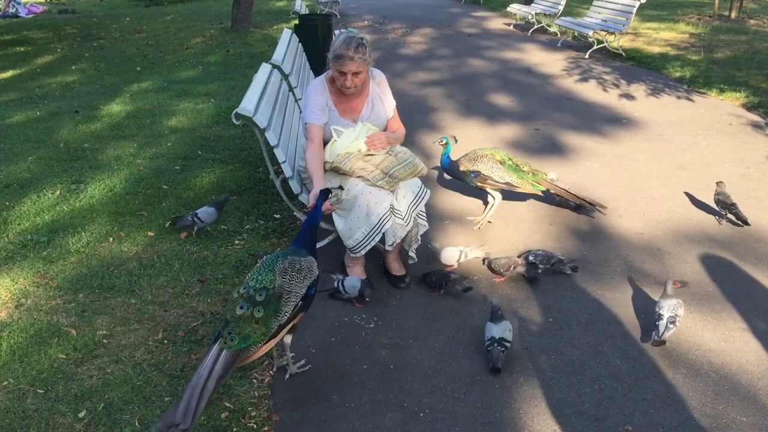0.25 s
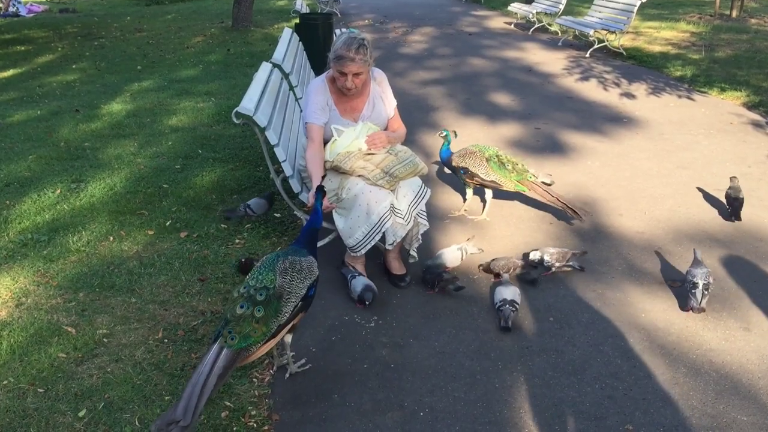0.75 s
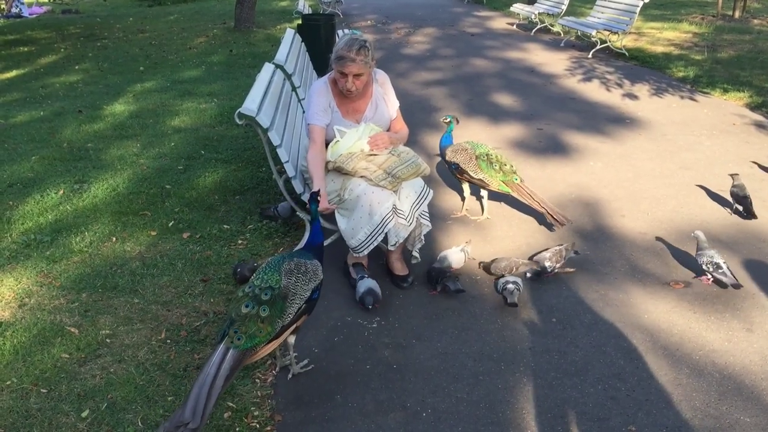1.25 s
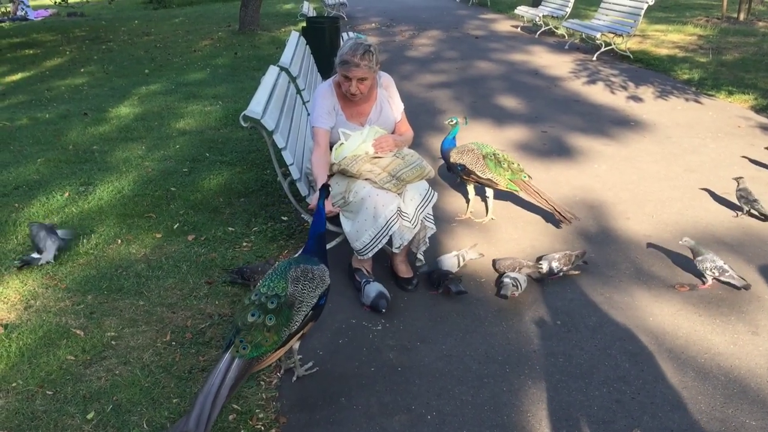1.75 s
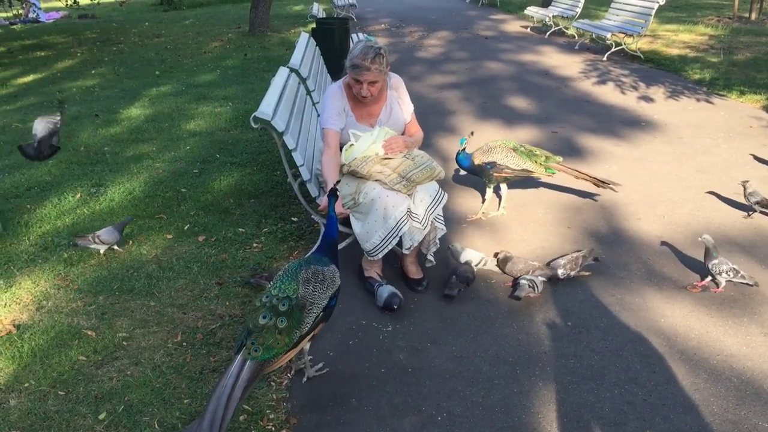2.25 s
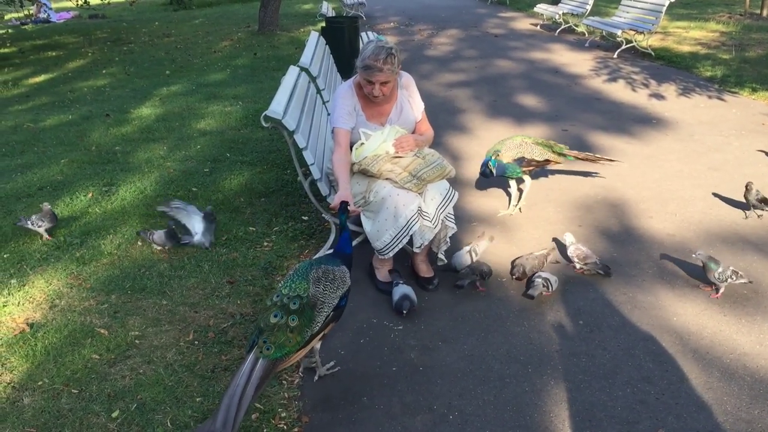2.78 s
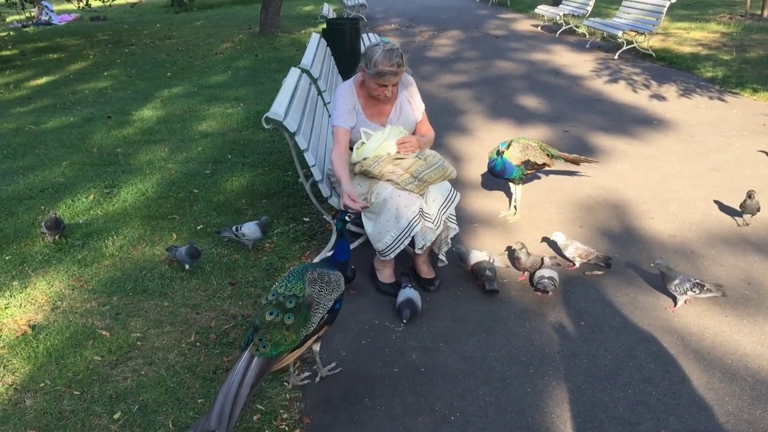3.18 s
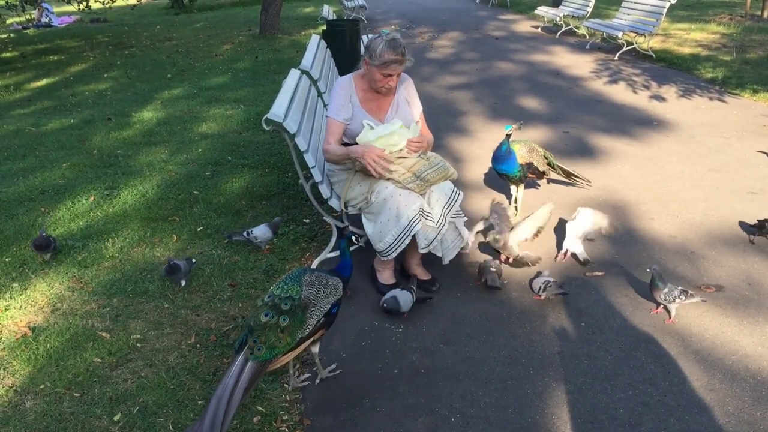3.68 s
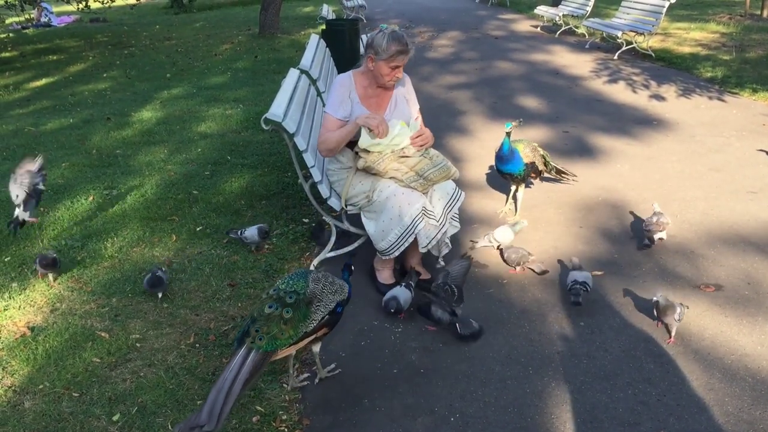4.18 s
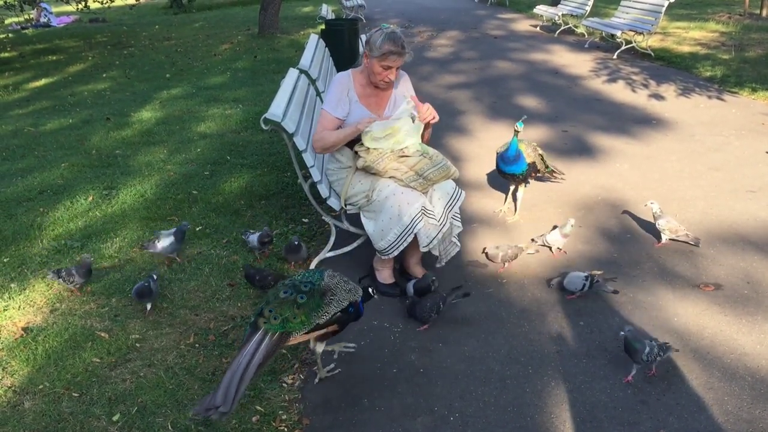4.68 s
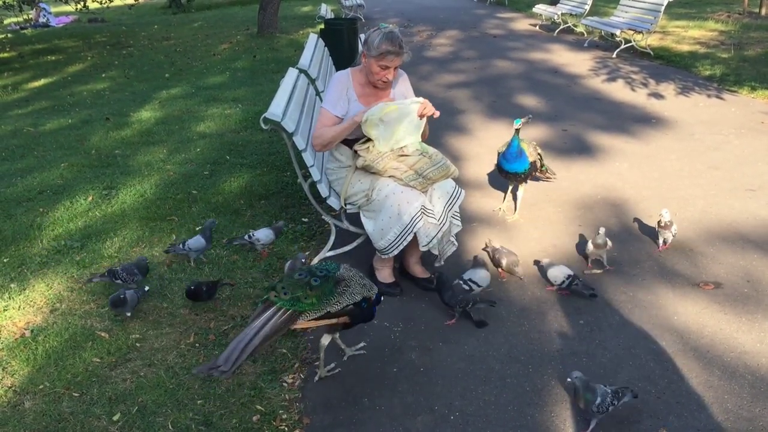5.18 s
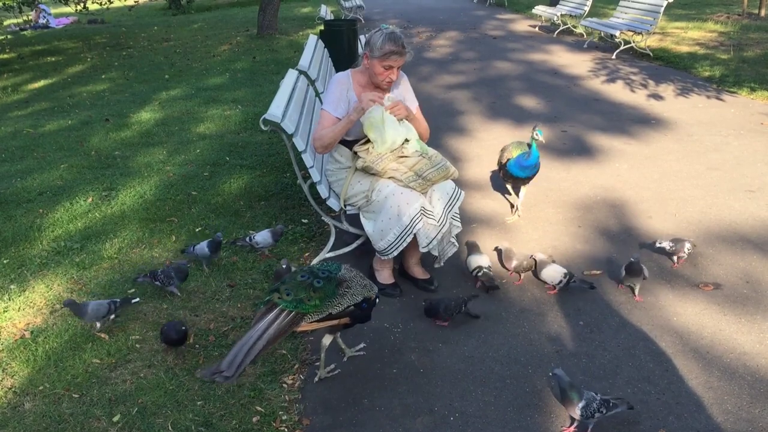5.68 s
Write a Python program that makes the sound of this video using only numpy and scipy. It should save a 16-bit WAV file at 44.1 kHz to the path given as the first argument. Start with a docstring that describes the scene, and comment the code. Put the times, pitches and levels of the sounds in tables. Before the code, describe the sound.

Faint insects trill and small birds chirp outdoors until a peacock calls once, loudly, with a brief echo.

```python
"""A peacock calls in a park

A peacock gives one loud cry that arches in pitch; its throat rings with the second harmonic (twice
the pitch). Trees throw the cry back, and a low rush with soft thumps and dry clicks starts and stops
abruptly around it. Behind it a cricket trills with its wings, small birds chip and whistle far off,
pigeons flap in puffs of air, and insects hiss."""
import sys
import numpy as np
from scipy import signal
from scipy.fft import rfft, irfft, next_fast_len
from scipy.io import wavfile
from scipy.ndimage import uniform_filter1d, map_coordinates

SR = 44100
rng = np.random.default_rng(int(sys.argv[2]) if len(sys.argv) > 2 else 0)


def unload_audio(sound):
    """Save the sound as a 16-bit wav file, at the path given as the first command line argument."""
    columns = np.transpose(np.atleast_2d(sound))
    # keep every value between -1 and 1, then stretch to whole-number steps
    steps = np.round(np.clip(columns, -1, 1) * 32767)
    wavfile.write(sys.argv[1], SR, steps.astype(np.int16))


N = 261513


def peacock(catch_s=4.61, open_s=4.672, tire_s=5.064, close_s=5.252, release_s=.02):
    """A cry whose second harmonic sits on the throat's resonance and carries nearly all the power."""
    # Each row: time in seconds, pitch in Hz.
    arch = [(4.63, 601), (4.644, 601), (4.696, 625.4), (4.72, 646), (4.786, 663.3), (4.912, 685.5),
            (4.926, 683), (5.02, 689.5), (5.082, 684.8), (5.092, 679.6), (5.232, 665.6), (5.245, 659.4)]
    # Harmonics five to nine. Each row: multiple of the pitch, relative level in dB.
    overtones = [(5, -38), (6, -28.5), (7, -39), (8, -41.5), (9, -42.5)]
    # Narrow resonances of throat and beak. Each row: frequency in Hz, gain in dB.
    throat = [(6300, -46), (6600, -38.5), (6860, -32), (7250, -39), (7550, -39.5), (7800, -35.5),
              (8100, -47), (8250, -42.5), (8480, -36.5), (8900, -40), (9200, -49.5), (9580, -39),
              (10020, -40), (10330, -44), (10700, -40), (11000, -44.5), (11320, -39), (11650, -49),
              (12000, -49.5), (12700, -47), (13800, -55.5), (15000, -56)]
    # What the treble loses when the voice is pinched. Each row: frequency in Hz, loss in dB.
    pinch_loss = [(6700, 1), (7600, 7.5), (9500, 7.5), (11500, 8.5), (13500, 1), (15000, -0.5)]
    # the voice catches, then goes through these stages, each rising from 0 to 1
    opened, settled, pinched = ramp(open_s, .037), ramp(4.745, .071), ramp(4.99, .1)
    tired, shut = ramp(tire_s, close_s - tire_s), ramp(close_s, release_s)
    gasp = tired ** 2
    hoarse = 1 - settled + gasp
    pitch = curves(arch)[0] * (1 - .066 * ramp(close_s, release_s / 2))  # drops as the beak closes
    catch_db = -16.5 * (1 - opened)
    main_db = -20 + catch_db - 7 * gasp - 10.5 * shut
    fourth_db = main_db - 25 + .07 * (pitch - pitch.max()) - 11 * tired
    low_db = -43.5 + catch_db / 4 - 11.5 * settled - 4 * pinched
    treble_db = main_db + 1 - 5 * (1 - settled) - 5.5 * tired
    # a slowing flutter, deepest as the voice starts and gives out; the pitch dips at each throb
    age = np.maximum(clock() - catch_s, 0)
    flutter_hz = (57.5 - 15.6 * age) * (age > 0)
    flutter = -np.cos(phase_of(flutter_hz))
    catching = ramp(catch_s, open_s - catch_s) * (1 - opened) ** 2
    throb = 1 + (.085 + .13 * (1 - settled) + .64 * catching + .37 * gasp) * flutter
    jitter = (.0016 + .0038 * hoarse) * wobble(200)
    phase = phase_of(pitch * (1 - .0035 * flutter + jitter))
    voiced = gate(catch_s, close_s + release_s, .0039) * amp(.6 * wobble(30))

    def harmonic(k, db):
        """A tone at k times the pitch that wavers on its own; high ones fray when hoarse."""
        waver_db = 1.1 * rng.uniform(-1, 1) * flutter + 1.4 * wobble(14) + .7 * wobble(110)
        fray = (.07 + .45 * hoarse) * (k / 16) ** 2 * wobble(600)
        return amp(db + waver_db) * np.sin(k * phase + fray)

    treble = middle = 0
    for k in range(10, 24):
        treble += harmonic(k, along(throat, k * pitch) - pinched * along(pinch_loss, k * pitch))
    # the sixth harmonic flares in the windpipe's upper resonance, and again when pinched
    for k, db in overtones:
        windpipe_db = 9 / (1 + ((k * pitch - 3830) / 90) ** 2)
        middle += harmonic(k, db + windpipe_db + 5 * pinched * (k == 6))
    low = harmonic(1, low_db) + harmonic(3, low_db - 9)
    breath = noise([(1000, -20), (3000, -8), (9000, 0), (15000, -13)], -10)[0]
    hiss = amp(-54 + 10.5 * hoarse) * breath * (1 + np.cos(phase))  # air hisses in each cycle
    rasp = noise([(500, -33.5), (1100, -3), (1350, -2.5), (1700, -18), (3000, -17), (9000, -43)], -11.5)
    top = ground_bounce(opened * amp(treble_db) * (treble + hiss))
    body = low + harmonic(4, fourth_db) + amp(main_db - 2) * middle
    main = amp(main_db) * (np.sin(2 * phase) + amp(-47) * rasp[0])
    beak_fade = 1 - ramp(close_s - release_s, release_s * 1.7)
    rest = beak_fade * (panned(throb * body, -.6) + top)
    return np.sqrt(2) * voiced * (panned(throb * main, -4) + rest)


def ground_bounce(treble):
    """A bounce off the path colours the cry's treble differently on each side."""
    # Left, then right. Each row: delay in seconds, share added (minus flips the wave).
    bounces = [(.0011, -0.32), (.0017, -0.37)]
    # Where the treble sits. Each row: frequency in Hz, left over right in dB.
    treble_pan = [(6500, 0.5), (8500, 0.5), (10500, 2), (12000, -2)]
    sides = np.array([treble + share * delayed(treble, delay) for delay, share in bounces])
    return filtered(sides, lambda hz: amp(np.outer([.5, -.5], along(treble_pan, hz))))


def trees(cry, tail_db=-30.5, travel_s=.09):
    """A few distinct echoes and a long blurred tail come back from the trees."""
    # Low harmonics spread all round and reach the trees best. Each row: frequency in Hz, gain in dB.
    spread = [(400, 5), (620, 10), (655, 16), (680, 20), (740, 18), (1000, 2), (1350, -1), (1850, 8),
              (2030, 20), (2700, 1), (4000, 3), (8000, -6)]
    # Each row: delay in seconds, gain in dB, left over right in dB.
    echo_paths = [(.135, -40, -3), (.25, -31, -2), (.385, -37, 1), (.56, -39, -2)]
    # Each row: frequency in Hz, seconds the tail takes to fade by 60 dB.
    fade_times = [(300, 0.81), (650, 2.2), (1400, 2.8), (4000, 0.47), (10000, 0.15)]
    sent = filtered(cry.mean(axis=0), lambda hz: amp(along(spread, hz)))
    echoes = sum(panned(amp(db) * late(sent, delay), pan) for delay, db, pan in echo_paths)
    return echoes + amp(tail_db) * scatter(late(sent, travel_s), fade_times, -9.5)


def rush(rumble_floor_db=-72, rush_floor_db=-60, fade_db_per_s=111.5):
    """A lumpy rumble and a dull rush swell as the cry begins and again after it."""
    # Each row: start in seconds, end in seconds, rumble level in dB, rush level in dB.
    swells = [(4.475, 4.694, -52.5, -50), (5.458, 5.65, -68, -50)]
    # The tone of the two noises. Each row: frequency in Hz, relative level in dB.
    rumble_colour = [(15, -27), (40, -1), (75, -3.5), (105, 0.5), (140, -3.5), (230, -6), (400, -8),
                     (900, -53.5), (3000, -89)]
    rush_colour = [(100, -17.5), (250, -8.5), (420, -1.5), (650, -2.5), (900, -6.5), (1250, 0.5),
                   (1700, -10), (2400, -20), (5000, -23.5), (10000, -38.5), (15000, -73.5)]
    rumble_gain, rush_gain = amp(rumble_floor_db), amp(rush_floor_db)
    for start, end, rumble_db, rush_db in swells:
        outside_s = abs(clock() - np.clip(clock(), start, end))
        swell = amp(-fade_db_per_s * outside_s)
        rumble_gain = np.hypot(rumble_gain, amp(rumble_db) * swell ** 2)  # fades twice as fast
        rush_gain = np.hypot(rush_gain, amp(rush_db) * swell)
    lumps = amp(2 * wobble(30))
    return rumble_gain * lumps * noise(rumble_colour, -34) + rush_gain * noise(rush_colour, -19)


def thumps(sag=.12):
    """Each soft thump is a few cycles of a low, sinking note."""
    # Each row: time of the peak in seconds, pitch in Hz, half-length in seconds, level in dB.
    bumps = [(4.546, 215, 0.0057, -41.5), (4.581, 210, .009, -45), (4.634, 102, .013, -41.5),
             (5.083, 100, 0.013, -56), (5.185, 90, 0.0096, -62), (5.266, 94.6, 0.0077, -51.5),
             (5.391, 100.2, 0.011, -53.5), (5.451, 105, 0.0072, -51.5)]
    out = np.zeros(N)
    for (peak_s, hz, half_s, db), turn in zip(bumps, rng.random(len(bumps))):
        offset = np.clip((clock() - peak_s) / half_s, -4, 4)
        tone = np.sin(phase_of(hz * (1 - sag * offset)) + 2 * np.pi * turn)
        out += amp(db) * np.exp(-offset ** 2) * tone
    return out


def clicks(fade_s=.0093, dull_hz=3300):
    """Dull cracks of noise die at once, as the rush starts and as the voice catches and opens."""
    # Each row: start in seconds, level in dB.
    cracks = [(4.457, -39), (4.607, -44), (4.6684, -32)]
    level = sum((clock() > s) * amp(db - 60 * np.maximum(clock() - s, 0) / fade_s) for s, db in cracks)
    crack = level * noise([(100, -10), (600, 5), (2000, 8), (3500, -10), (7000, -34)], -7)
    return filtered(crack, lambda hz: 1 / (1 + (hz / dull_hz) ** 6))


def cricket(tone_hz=6235, flat_hz=190, strokes_per_s=54.65, bout_s=.682):
    """Wing strokes pulse one tone; each bout starts a little low and soft, then settles."""
    # The start of each bout in seconds.
    bout_starts = [-.31, 1.134, 2.525, 4.06, 5.53]
    out = np.zeros(N)
    for start in bout_starts:
        unsettled = 1 - ramp(start, .19)
        strokes = 2 * np.clip(.55 - np.cos(2 * np.pi * strokes_per_s * (clock() - start)), 0, 1)
        tone = np.sin(phase_of(tone_hz * (1 + .006 * wobble(400)) - flat_hz * unsettled))
        out += gate(start, start + bout_s, .0034) * amp(-57.5 - 2 * unsettled) * strokes * tone
    return panned(out, 1) + amp(-18) * scatter(out, [(6000, .28)], 0)


def chipping_bird(rasp_width_hz=190):
    """A small bird's chips hook up sharply and fall away hoarsely; now and then it rasps."""
    # Each row: start in seconds, level in dB, hoarseness (1 is usual), change in the tail in dB.
    chips = [(.465, -56, .9, 0), (.872, -54, .9, .5), (1.367, -52, .9, -1.5), (1.954, -51, .9, -2),
             (2.394, -53, 1.8, .5), (2.602, -51.5, 1, 0), (3.295, -50.5, 1, -2), (3.957, -53, 1, -2)]
    # One chip. Each row: seconds from its start, pitch in Hz, gain in dB, jitter as a share of pitch.
    shape = [(0, 3850, -7, .02), (.008, 4220, 1, .012), (.015, 4330, 1.5, .012), (.024, 4050, -4, .03),
             (.034, 3600, -8.5, .06), (.07, 3050, -10.5, .06)]
    # Each row: start in seconds, length in seconds, frequency in Hz, level in dB.
    rasps = [(1.124, 0.23, 4300, -64), (3.617, 0.094, 4060, -60.5), (4.568, 0.11, 4185, -53.5),
             (5.421, 0.18, 4170, -57.5)]
    tail_s, chip_s = shape[-2][0], shape[-1][0]
    out = np.zeros(N)
    for (start, db, hoarse, tail_db), tuning in zip(chips, rng.normal(1, .008, len(chips))):
        hz, shape_db, jitter = curves(shape, start)
        tone = np.sin(phase_of(hz * (tuning + hoarse * jitter * wobble(700))))
        level_db = db + shape_db + tail_db * ramp(start, tail_s) ** 2 + 1.2 * wobble(120)
        out += gate(start, start + chip_s, .002) * amp(level_db) * tone
    for start, length, hz, db in rasps:
        band = filtered(rng.standard_normal(N), lambda f: np.exp(-((f - hz) / rasp_width_hz) ** 2))
        out += gate(start, start + length, .016) * amp(db) * unit(band)
    return amp(-2) * out + amp(-1.5) * scatter(out, [(4000, .71)], 0)


def birds_and_tones(waver=.012, quaver_hz=24, quaver_db=3, chatter_low_hz=732, chatter_high_hz=2390):
    """Far birds call, blurred by distance; two thin tones and a rough burst sound around the cry."""
    # Bird whistles, plus two brief tones near 4 kHz: one as the rush starts, one ringing after the cry.
    # Each row: start and length in seconds, first and last pitch in Hz, level in dB.
    thin_tones = [(0.164, 0.2, 7730, 7350, -61.5), (2.203, 0.26, 2132, 2076, -70),
                  (2.262, 0.12, 10070, 10850, -70), (2.945, 0.38, 1968, 1964, -75.5),
                  (3.378, 0.18, 2357, 2470, -67), (4.449, 0.069, 3980, 4015, -47.5),
                  (5.319, .13, 3977, 3998, -54), (5.377, 0.15, 2516, 2516, -61)]
    # A songbird's two phrases, a list each. Each row: time in seconds, pitch in Hz, level in dB.
    phrases = [
        [(.17, 2420, -77), (.4, 2285, -68.5), (.52, 2398, -65), (.62, 2510, -65), (.66, 2493, -56),
         (.79, 2390, -58.5), (.88, 2444, -62), (.98, 2400, -73)],
        [(1.58, 2600, -71), (1.65, 2544, -67), (1.685, 2510, -56), (1.75, 2420, -61), (1.8, 2290, -58),
         (1.87, 2222, -62), (1.96, 2146, -61), (2.03, 2130, -72)],
    ]
    # Bird pips; the last row is instead a short, rough burst near 1.3 kHz as the rush starts.
    # Each row: the same as a thin tone, then jitter as a share of pitch.
    short_notes = [(0, .028, 1330, 1350, -58, .03), (.018, .045, 980, 880, -58.5, .04),
                   (.035, .05, 1850, 1350, -58, .02), (.052, .04, 3480, 3480, -58, .006),
                   (.322, .028, 1240, 1300, -61, .03), (1.352, .024, 1380, 1440, -54, .02),
                   (1.862, .03, 3480, 3470, -57.5, .006), (2.055, .035, 3490, 3470, -57, .006),
                   (2.474, .05, 950, 810, -58, .06), (2.78, .04, 770, 800, -64, .06),
                   (2.935, .075, 870, 840, -63, .08), (2.995, .035, 1950, 1965, -61.5, .008),
                   (3.04, .032, 820, 850, -59.5, .04), (3.105, .035, 900, 830, -64, .06),
                   (3.14, .14, 780, 760, -67, .03), (3.26, .045, 1270, 1400, -64, .02),
                   (3.29, .04, 860, 850, -64.5, .05), (4.231, .04, 1220, 1250, -61.5, .05),
                   (4.457, .045, 1400, 1280, -48, .1)]

    def note(start, length, first_hz, last_hz, db, jitter=waver):
        """One gliding tone that swells and fades."""
        progress = ramp(start, length)
        hz = (first_hz + (last_hz - first_hz) * progress) * (1 + jitter * wobble(350))
        return np.sin(np.pi * progress) * amp(db) * np.sin(phase_of(hz))

    out = sum(note(*row) for row in thin_tones)
    for phrase in phrases:
        hz, db = curves(phrase)
        quaver = quaver_db * np.cos(2 * np.pi * quaver_hz * (clock() - phrase[2][0]))
        tone = np.sin(phase_of(hz * (1 + waver * wobble(350))))
        song = gate(phrase[0][0], phrase[-1][0], .02) * amp(db + quaver) * tone
        out += song + amp(-12) * late(song, .13)  # one echo from the trees
    out *= amp(2.2 * wobble(60))  # the level flickers
    for when, height in rng.random((14, 2)):
        hz = chatter_low_hz * (chatter_high_hz / chatter_low_hz) ** height
        out += note(when * N / SR, .12, hz, hz, db=-72.5)
    out += sum(note(*row) for row in short_notes)
    tail = scatter(out, [(800, .3), (1300, .18), (2400, .94), (3500, .77), (10000, .13)], 0)
    return panned(out, 2) + amp(-4) * tail


def pigeons(puff_hz=1174, width=.095):
    """Each wing beat is a short puff of air."""
    # Each row: start in seconds, length in seconds, beats a second, level in dB.
    flurries = [(0, 0.084, 27, -66), (0.628, 0.45, 23.2, -62.5), (1.574, 0.32, 22.2, -61.5)]
    out = np.zeros(N)
    band = lambda hz: np.exp(-(np.log((hz + 1) / puff_hz) / width) ** 2)
    for start, length, rate, db in flurries:
        beats = np.sin(np.pi * rate * (clock() - start)) ** 6
        puff = unit(filtered(rng.standard_normal(N), band))
        out += gate(start, start + length, .0064) * amp(db) * beats * puff
    return panned(out, 1) + amp(-8) * scatter(out, [(1000, .3)], 0)


def open_air():
    """A soft, wide wash of air drifts in level."""
    # Each row: frequency in Hz, relative level in dB.
    colour = [(15, -50), (45, -14), (130, -26), (250, -27.5), (400, -15), (560, -11.5), (800, -2),
              (1000, -5), (1300, -3), (2000, -4), (3500, -6), (5000, -41.5), (9000, -67.5)]
    return amp(-64.5 + 1.06 * wobble(3.584)) * patchy(noise(colour, 2.6), 2.7)


def insects():
    """An insect chorus hisses at 4-7 kHz, with a faint, even high hiss above it."""
    # Each row: frequency in Hz, relative level in dB.
    colour = [(2500, -29), (3700, -10.5), (4200, -3), (4450, -8), (4660, 2), (5050, -11.5), (5370, 3.5),
              (5900, -0.5), (6550, -7), (6900, 6.5), (7150, 1), (7550, -14.5), (9200, -22.5),
              (10000, -31.5), (12800, -31), (14000, -59.5)]
    return amp(-57 + .36 * wobble(1.66) + .52 * wobble(40)) * patchy(noise(colour, 0), 2.5)


def amp(db):
    """Turns decibels into a gain."""
    return 10 ** (np.asarray(db) / 20)


def unit(x):
    """Scales x to an average power of 1."""
    return x / np.sqrt(np.mean(x ** 2) + 1e-20)


def clock():
    """The time of every sample in seconds."""
    return np.arange(N) / SR


def along(points, hz):
    """Reads between (Hz, value) points, with octaves evenly spaced."""
    freqs, values = np.transpose(points)
    return np.interp(np.log(hz + 1), np.log(freqs + 1), values)


def curves(rows, start=0):
    """One value per sample for each column after the time."""
    times, *columns = np.transpose(rows)
    return [np.interp(clock() - start, times, column) for column in columns]


def ramp(start, length):
    """Rises from 0 to 1 over a length of time."""
    return np.clip((clock() - start) / length, 0, 1)


def gate(start, end, edge):
    """One between two times, with sloping edges."""
    return ramp(start, edge) * np.clip((end - clock()) / edge, 0, 1)


def wobble(rate):
    """A smooth curve through rate random points a second."""
    points = rng.standard_normal(int(N * rate / SR) + 4)
    return map_coordinates(points, [clock() * rate])


def phase_of(hz):
    """The running phase of a frequency curve."""
    return 2 * np.pi * np.cumsum(hz) / SR


def panned(x, pan_db):
    """Leans a sound left (plus) or right (minus)."""
    return x * amp([[pan_db / 2], [-pan_db / 2]])


def filtered(x, response):
    """Scales each frequency of x by response(hz)."""
    size = next_fast_len(N + SR // 2)
    return irfft(rfft(x, size) * response(np.fft.rfftfreq(size, 1 / SR)), size)[..., :N]


def late(x, seconds):
    """A later copy of x, for echoes."""
    return np.interp(clock() - seconds, clock(), x)


def delayed(x, seconds):
    """A tiny, exact delay that keeps the treble whole."""
    return filtered(x, lambda hz: np.exp(-2j * np.pi * hz * seconds))


def noise(colour, side_db):
    """Stereo noise shaped by (Hz, dB) points; more side_db makes it wider."""
    mid, side = filtered(rng.standard_normal((2, N)), lambda hz: amp(along(colour, hz)))
    side = amp(side_db) * unit(side)
    return np.array([unit(mid) + side, unit(mid) - side])


def scatter(x, fade_times, side_db):
    """The blurred answer of trunks and leaves, shaped by (Hz, seconds to fade 60 dB) points."""
    hz, t, spectrum = signal.stft(rng.standard_normal((2, SR)), SR, nperseg=256)
    fade = amp(-60 * t / along(fade_times, hz)[:, None])
    tail = signal.istft(spectrum * fade, SR, nperseg=256)[1]
    mid, side = signal.fftconvolve(x[None], tail / np.linalg.norm(tail[0]), axes=1)[:, :N]
    return np.array([mid + amp(side_db) * side, mid - amp(side_db) * side])


def patchy(x, depth_db):
    """Gives x louder and softer patches in time and frequency."""
    spectrum = signal.stft(x, nperseg=1024)[2]
    patches = uniform_filter1d(rng.standard_normal(spectrum.shape[1:]), size=5, axis=0)
    patches = uniform_filter1d(patches, size=9, axis=1)
    return signal.istft(spectrum * amp(depth_db * unit(patches)), nperseg=1024)[1][:, :N]


def scene():
    """The cry, its echoes and the rush stand close in front of the quiet park."""
    cry = delayed(peacock(), np.array([[.000012], [0]]))  # reaches the left a little later
    abrupt = gate(start=4.457, end=5.656, edge=.0015)
    near = (cry + trees(cry) + rush() + thumps()) * abrupt + clicks()
    park = panned(open_air() + insects(), .97)
    return near + park + cricket() + chipping_bird() + birds_and_tones() + pigeons()


def record(dry, top_hz=15300):
    """Cuts off the very highest treble."""
    return filtered(dry, lambda hz: hz < top_hz)


dry = scene()
out = record(dry)
unload_audio(out)
```